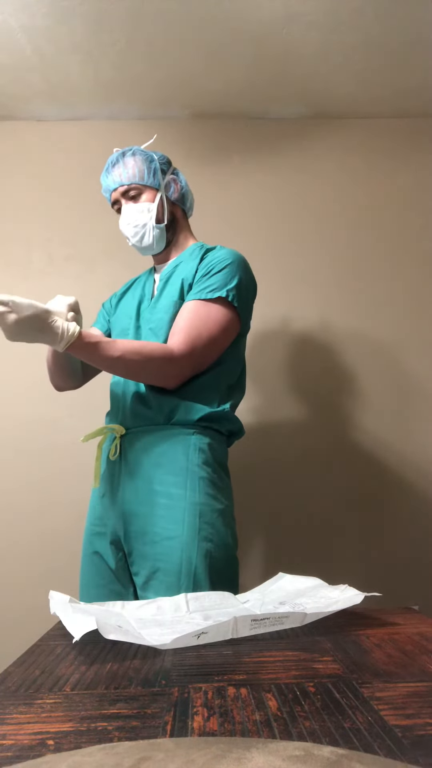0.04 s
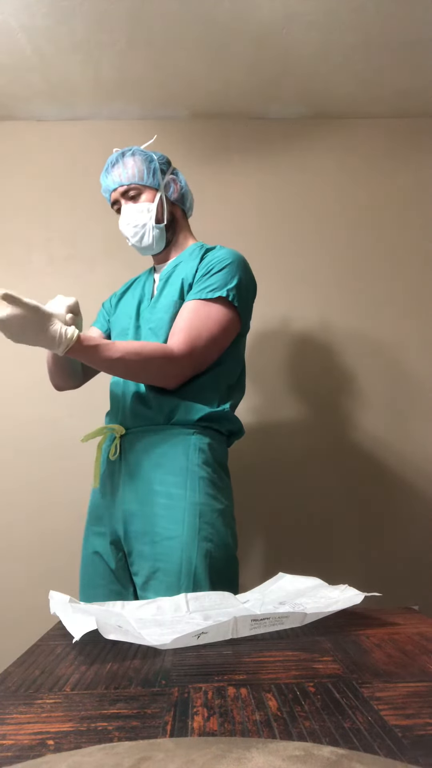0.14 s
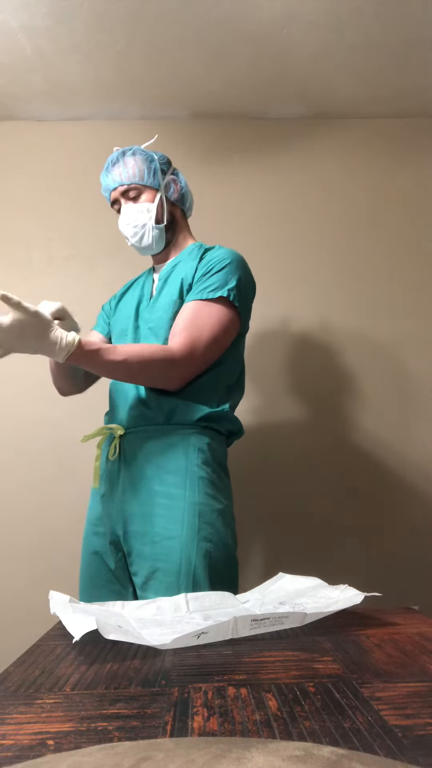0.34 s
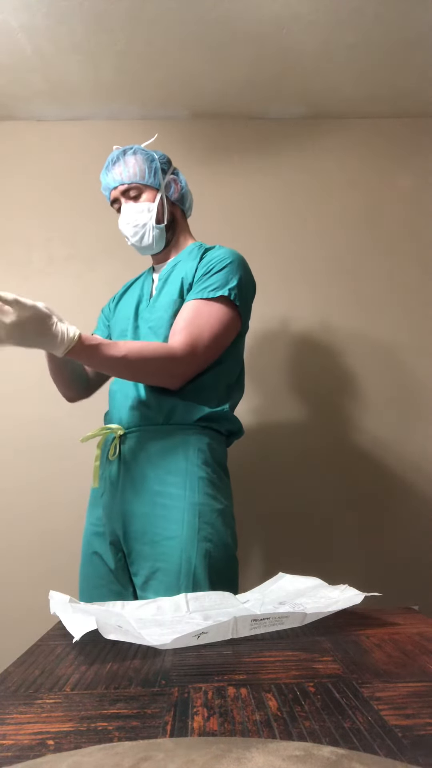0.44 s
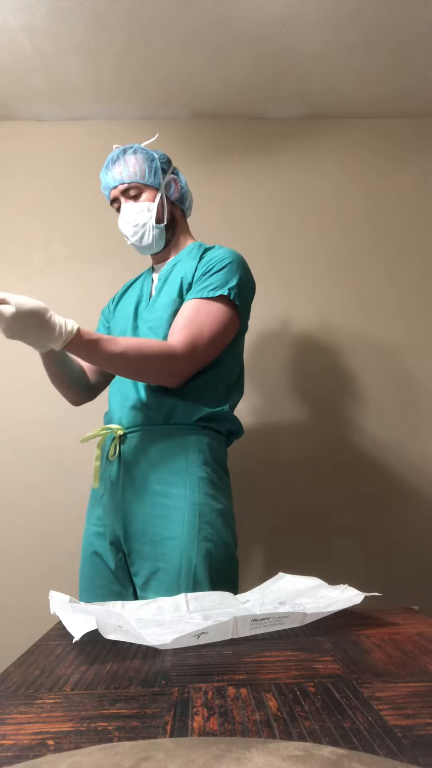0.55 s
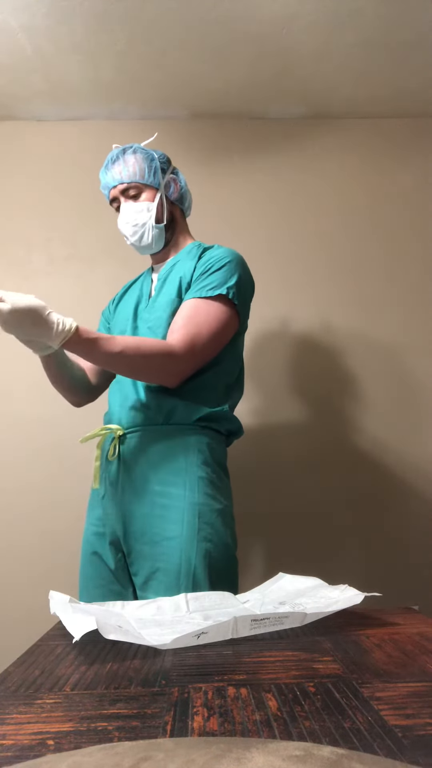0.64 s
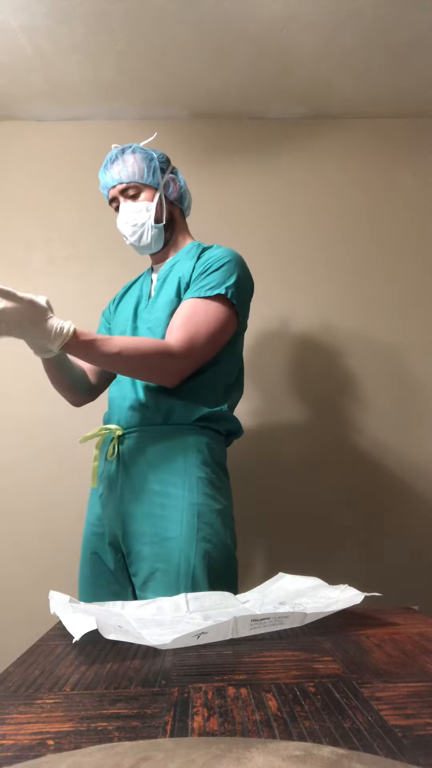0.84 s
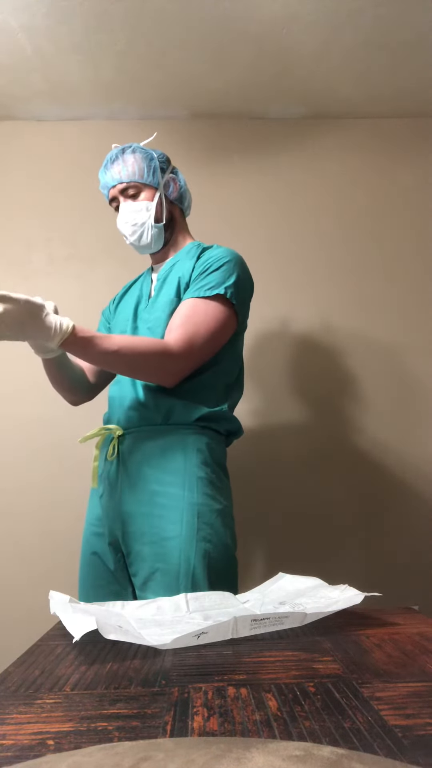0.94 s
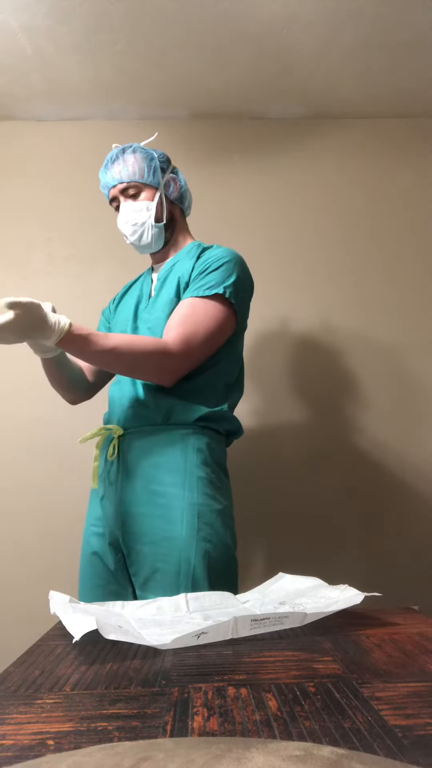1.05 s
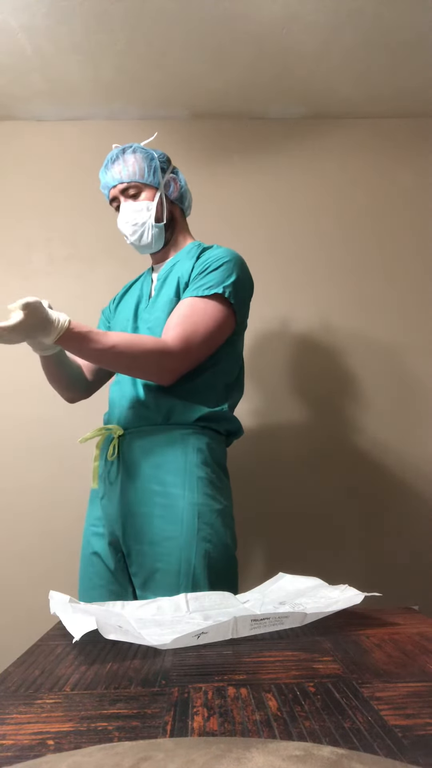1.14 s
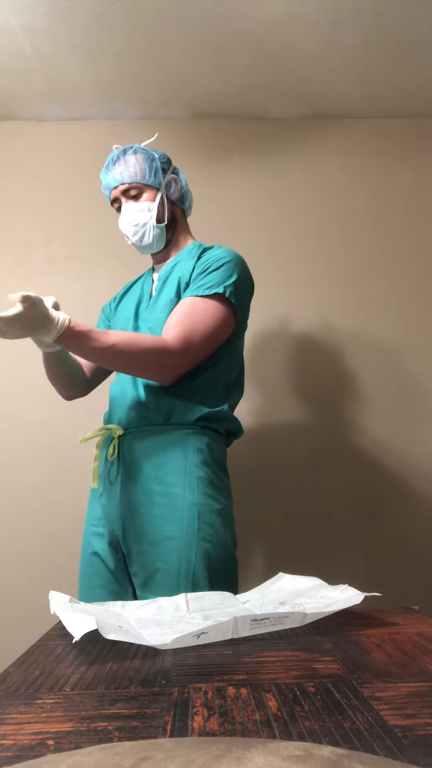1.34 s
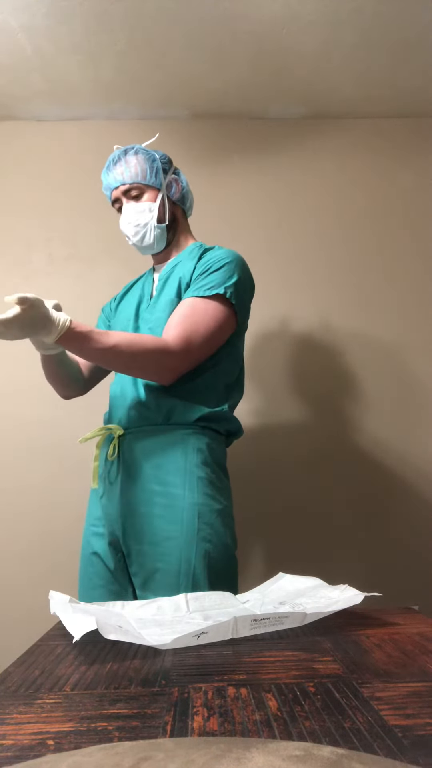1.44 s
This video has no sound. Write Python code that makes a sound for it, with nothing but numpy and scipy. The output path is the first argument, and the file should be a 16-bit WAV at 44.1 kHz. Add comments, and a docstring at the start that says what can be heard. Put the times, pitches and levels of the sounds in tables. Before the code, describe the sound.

A latex glove is tugged on a couple of metres away in a small, quiet room, with faint rubbing, hissing and ticks. The cuff snaps lightly at 0.2 seconds, then loudest at 0.4 seconds in a sharp double snap with brief reverberation. A softer snap follows at 0.8 seconds. The rubbing fades, with two very faint low bumps near 1.0 and 1.3 seconds.

```python
"""In a small, quiet, bare room, a latex glove is tugged on a couple of metres away.
Stick-slip friction makes the stretched rubber rub, hiss and tick. The cuff snaps against the wrist:
the impact gives a crack, a short ping of the membrane and a hollow slap of skin and trapped air.
Ceiling and walls return reflections and reverberation; two faint low bumps come near the end."""
import sys
import numpy as np
from scipy import signal
from scipy.fft import rfft, irfft
from scipy.io import wavfile

SR = 44100
rng = np.random.default_rng(int(sys.argv[2]) if len(sys.argv) > 2 else 0)


def dump(signal):
    """Clip the signal to [-1, 1] and save it as 16-bit WAV at the path in sys.argv[1]."""
    limited = np.clip(np.atleast_2d(signal).T, -1, 1)
    pcm = np.round(limited * 32767).astype(np.int16)
    wavfile.write(sys.argv[1], SR, pcm)


N = 66150
TIME, FREQS = np.arange(N) / SR, np.fft.rfftfreq(N, 1 / SR)


def undb(db):
    """Amplitude ratio of a level in decibels."""
    return 10 ** (np.asarray(db) / 20)


def along(hz, table, column=1):
    """Interpolation of a table column on a log-frequency axis."""
    points = np.array(table, float)
    return np.interp(np.log(hz + 1), np.log(points[:, 0]), points[:, column])


def colour(x, spectrum):
    """Spectral shaping, normalised to rms 1."""
    shaped = irfft(rfft(x) * undb(along(FREQS, spectrum)), N)
    return shaped / shaped.std()


def burst(x):
    """Normalisation of a transient to the energy of rms 1 held for 5 ms."""
    return x * np.sqrt(.005 * SR / np.sum(x ** 2))


def swell(rise_s):
    """Gamma envelope: peaks at rise_s and dies almost as fast."""
    u = TIME / rise_s
    return u ** 2 * np.exp(-2 * np.minimum(u, 100))


def delay(x, s):
    """Pure delay of s seconds."""
    return np.pad(x, (max(int(s * SR), 0), 0))[:N]


def ping(hz, rise_s, band_hz):
    """Damped resonance: a few band-limited cycles."""
    bandpass = signal.butter(4, band_hz, "band", fs=SR, output="sos")
    return burst(signal.sosfilt(bandpass, swell(rise_s) * np.sin(2 * np.pi * hz * TIME)))


def crack(s, spectrum, rise_s, tilt_db=0):
    """Broadband transient: a whitened noise burst at time s through a minimum-phase filter."""
    noise = rfft(delay(swell(rise_s) * rng.standard_normal(N), s))
    white = irfft(noise / abs(noise), N) * (TIME >= s)
    octaves_above_3khz = np.log2(np.maximum(FREQS / 3000, 1))
    gain = undb(along(FREQS, spectrum) + tilt_db * octaves_above_3khz)
    cepstrum = irfft(np.log(gain), N)
    minimum_phase = np.exp(rfft(2 * cepstrum[:N // 2], N))
    return burst(irfft(rfft(white) * minimum_phase, N))


# spectrum of the room tone (frequency [Hz], relative density [dB])
ROOM_TONE = [(25, -11), (38, -35.5), (50, -3), (130, -2), (250, -5), (480, -4), (700, -9.5), (1400, -15.5),
             (4000, -23), (7800, -22), (9000, -25.5), (16000, -30)]

def room_tone(level_db=-71):
    """Ambient noise floor: stationary noise, strongest in the bass."""
    return undb(level_db) * colour(rng.standard_normal(N), ROOM_TONE)


# diffuse field (frequency [Hz], reverberation time T60 [s], band gain [dB])
REVERB = [(121, .45, -12.5), (262, 0.27, -1), (417, 0.35, -4.5), (650, 0.42, -8.5), (1050, 0.4, -5.5),
          (2030, 0.28, 1.5), (3900, 0.31, -0.5), (8150, 0.28, -1.5), (15900, 0.29, 1.5)]

def reverberation(x, gap_s=.004, build_s=.0053):
    """Diffuse reflection: the field builds up quickly, then decays exponentially in half-octave bands."""
    noise, tail = rfft(rng.standard_normal(N)), 0
    centres = 62.5 * 2 ** np.arange(0, 8.5, .5)
    for hz, pick in zip(centres, np.eye(len(centres))):
        share = np.interp(np.log(FREQS + 1), np.log(centres), pick)
        envelope = (1 - np.exp(-TIME / build_s)) * np.exp(-np.log(1000) * TIME / along(hz, REVERB))
        band = irfft(noise * share, N) * envelope
        band *= np.sqrt(np.mean(share ** 2) / np.sum(band ** 2))
        tail += band * undb(along(hz, REVERB, column=2))
    return signal.fftconvolve(x, delay(tail, gap_s))[:N]


# first reflections (delay [s], gain [dB])
REFLECTIONS = [(.0050, -7.5), (.0085, -9.5), (0.0196, -14), (0.023, -13.5)]

def early_reflections(direct):
    """Specular reflection: ceiling, table and walls each return a delayed, weaker copy."""
    return sum(undb(db) * delay(direct, s) for s, db in REFLECTIONS)


# soft bumps (time [s], frequency [Hz], level [dB])
LOW_BUMPS = [(.95, 120.5, -65.5), (1.304, 128, -64)]

def bumps(rise_s=.0064):
    """Heavily damped low resonances, heard as faint, dull bumps."""
    return sum(undb(db) * delay(ping(hz, rise_s, (hz / 2, hz * 2)), s) for s, hz, db in LOW_BUMPS)


# rubbing of the sheet over the hand and fine hiss of stretching latex (time [s], level [dB])
RUB_LEVELS = [(0, -64), (.09, -71), (.12, -59), (.15, -64.5), (.2, -61.5), (.26, -54.5), (.34, -63),
              (.385, -65.5), (.5, -63.5), (.64, -72), (.675, -59), (.72, -67), (.755, -62.5), (.785, -71.5),
              (.82, -58.5), (.9, -60.5), (.99, -73.5), (1.5, -110)]
STRETCH_LEVELS = [(0, -55), (.06, -70.5), (.13, -62), (.19, -64), (.36, -76), (.5, -63), (.565, -60.5),
                  (.64, -68.5), (.71, -66.5), (.8, -69.5), (.9, -66.5), (1.02, -79.5), (1.065, -73),
                  (1.14, -72), (1.2, -78), (1.35, -80), (1.405, -74), (1.5, -83.5)]
# their spectra (frequency [Hz], relative level [dB])
RUB_SPECTRUM = [(40, -42), (120, -27), (290, 5.5), (550, 5), (850, 7.5), (1300, 5.5), (2200, 3.5),
                (3600, 2), (5000, -13.5), (7500, -5), (9000, -30), (16000, -21)]
STRETCH_SPECTRUM = [(60, -27), (500, 8), (2000, -9), (3000, 3), (4200, 5), (5500, 0), (7600, -2),
                    (9000, -9), (16000, -18.5)]

def friction(levels, spectrum, slips_per_s=2800, spread_db=2, room_db=2):
    """Stick-slip friction: dense random impulses, smeared by the room, follow a level curve."""
    slips = (rng.random(N) < slips_per_s / SR) * rng.standard_normal(N)
    slips *= undb(spread_db * rng.standard_normal(N))
    sound = colour(slips + undb(room_db) * reverberation(slips), spectrum)
    return sound * undb(np.interp(TIME, *np.array(levels).T))


# spectrum of the rubber's crack (frequency [Hz], relative level [dB])
CRACK_SPECTRUM = [(150, -14), (1000, -13), (2600, -15), (3500, 2.5), (5500, 9.5), (7800, 4.5), (8800, -2),
                  (11000, -6.5), (13500, -19.5), (16000, -34)]

def rubber_crack(s, rise_s, tilt_db):
    """Impulsive excitation: a brief force on the rubber radiates a broad band of frequencies."""
    return crack(s, CRACK_SPECTRUM, rise_s, tilt_db)


def membrane_ping(s, hz, rise_s):
    """Membrane resonance: taut, heavily damped rubber rings for a few cycles."""
    return delay(ping(hz, rise_s, (.8 * hz, 1.23 * hz)), s)


# slips of rubber on skin (time [s], ping frequency [Hz], ping level [dB])
SLIPS = [(.003, 5340, -64.5), (0.0439, 4470, -62), (0.104, 3600, -66), (.1088, 3590, -52.5),
         (.1220, 3730, -66), (0.1635, 3340, -48), (0.175, 3220, -69), (0.183, 5700, -67),
         (.696, 3700, -63.5), (0.754, 3880, -66.5), (.797, 3580, -63.5), (1.044, 7200, -72.5)]

def ticks(rise_s=.0004):
    """Plucked membrane: each small slip excites a ping and a weaker, dull crack."""
    return sum(undb(db) * (membrane_ping(s, hz, rise_s) + undb(-4.5) * rubber_crack(s, rise_s, -13.5))
               for s, hz, db in SLIPS)


# spectrum of the loose sheet's dull flap (frequency [Hz], relative level [dB])
FLAP_SPECTRUM = [(60, -37), (130, -12), (230, -1), (450, 0.5), (950, -3), (1400, -3.5), (2000, -5),
                 (2900, 0.5), (4500, -15), (8000, -21)]
# snaps (time [s], ping level [dB], ping rise [s], slap frequency [Hz], slap level [dB], flap level [dB],
# crack level [dB], crack rise [s], crack tilt above 3 kHz [dB/octave],
# shading of direct slap and flap [dB], gain into the room [dB])
CUFF_SNAPS = [(0.209, -59.5, 0.00035, 333, -55.5, -44.5, -42.5, 0.00036, -4, -17, 1.5),
              (0.3907, -33.5, 0.00044, 595, -29, -34, -39.5, 0.00046, -2.5, -2.5, 1),
              (0.4225, -52, 0.00033, 474, -40.5, -39.5, -36.5, 0.0013, 14, -11, -1),
              (0.8256, -46.5, 0.00018, 390, -51, -46.5, -58.5, 0.0002, 10, -28, 0)]

def cuff_snaps(cuff_hz=3980, slap_band_hz=(223.5, 1110), slap_lag_s=.00045):
    """Impact: the released cuff strikes the wrist, exciting rubber, skin and trapped air."""
    direct, into_room = 0, 0
    for (s, ping_db, ping_rise_s, slap_hz, slap_db, flap_db,
         crack_db, crack_rise_s, tilt_db, shade_db, room_db) in CUFF_SNAPS:
        rubber = undb(ping_db) * membrane_ping(s, cuff_hz, ping_rise_s)
        rubber += undb(crack_db) * rubber_crack(s, crack_rise_s, tilt_db)
        slap = undb(slap_db) * delay(ping(slap_hz, rise_s=.00082, band_hz=slap_band_hz), s + slap_lag_s)
        flap = undb(flap_db) * crack(s, FLAP_SPECTRUM, rise_s=.001246)
        direct += rubber + undb(shade_db) * (slap + flap)
        into_room += undb(room_db) * (rubber + slap + flap)
    return direct, into_room


def scene():
    """Superposition of direct sound, reflections and reverberation over the room tone."""
    snaps, snaps_into_room = cuff_snaps()
    ticking = ticks()
    direct = snaps + ticking
    rubbing = friction(RUB_LEVELS, RUB_SPECTRUM) + friction(STRETCH_LEVELS, STRETCH_SPECTRUM)
    background = room_tone() + bumps()
    diffuse = reverberation(snaps_into_room + undb(-5) * ticking)
    return (background + diffuse + early_reflections(direct) + rubbing + direct)[None]


def record(dry):
    """Band limiting: a steep elliptic low-pass removes the treble above 15.75 kHz."""
    return signal.sosfilt(signal.ellip(10, .2, 70, 15750, fs=SR, output="sos"), dry)


dry = scene()
out = record(dry)
dump(out)
```